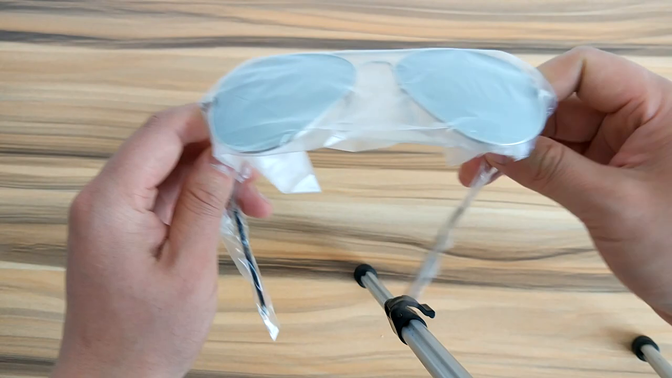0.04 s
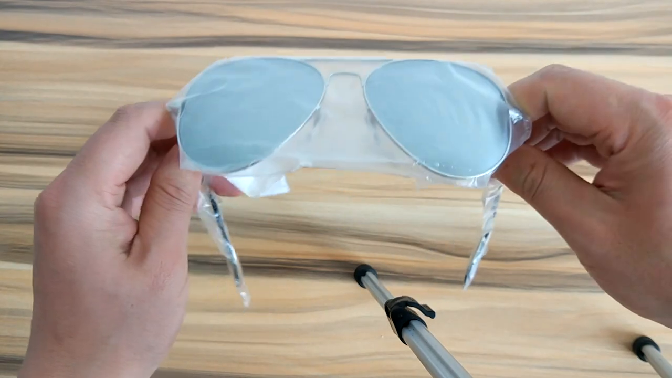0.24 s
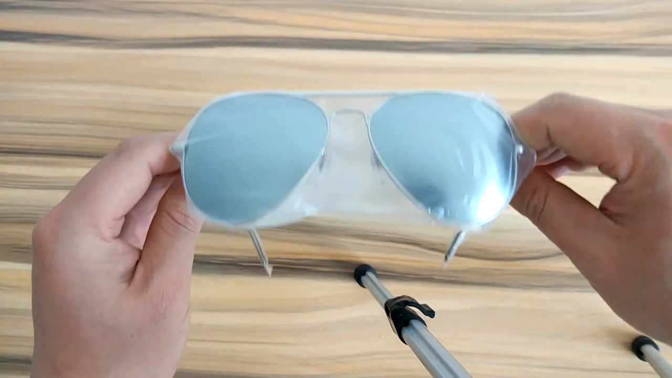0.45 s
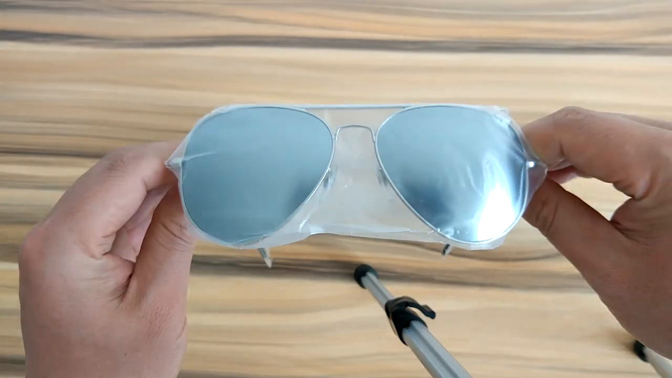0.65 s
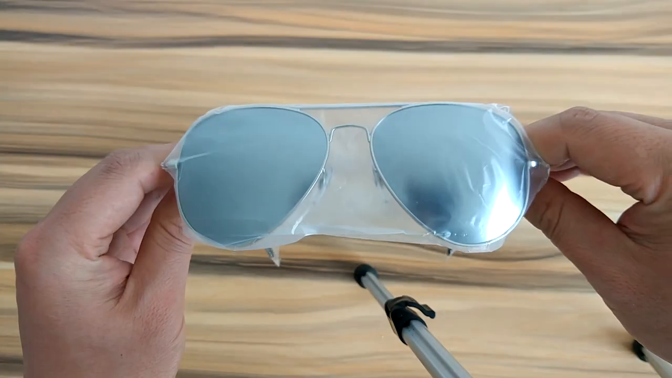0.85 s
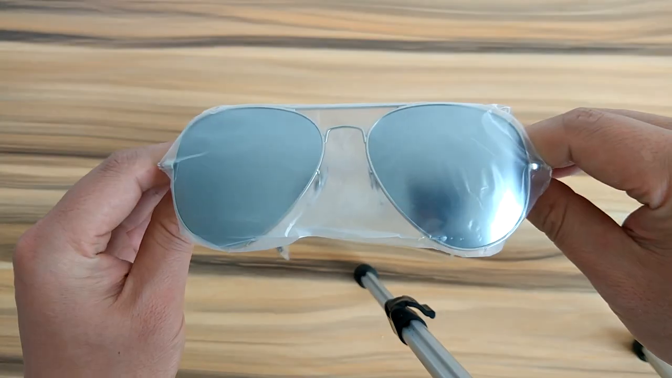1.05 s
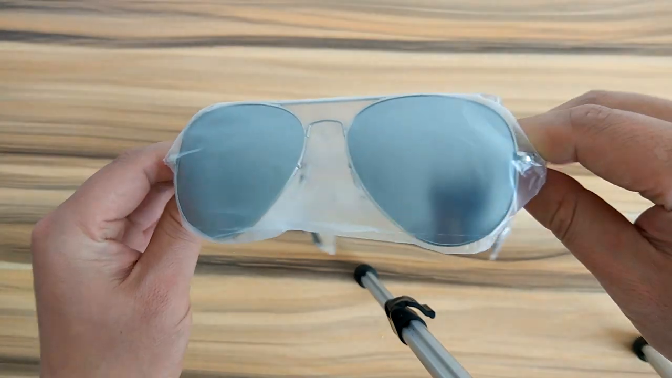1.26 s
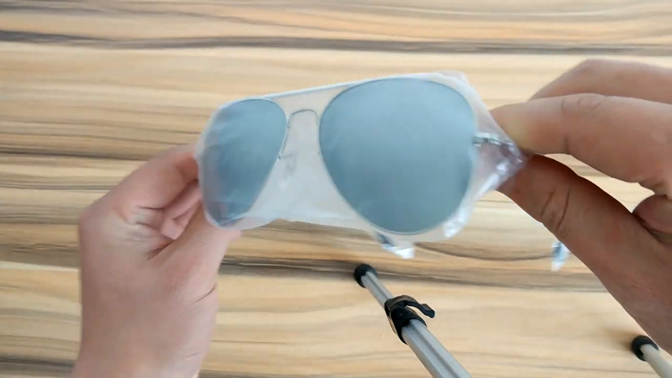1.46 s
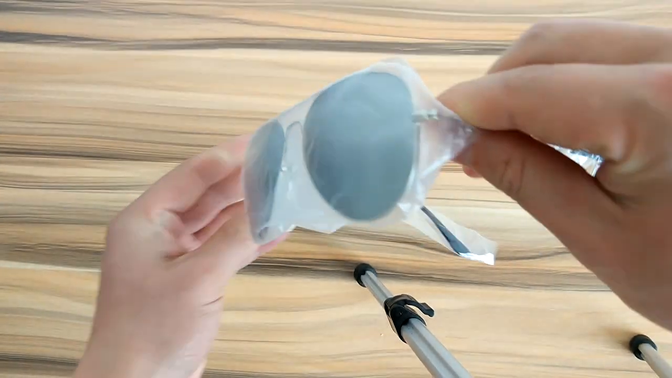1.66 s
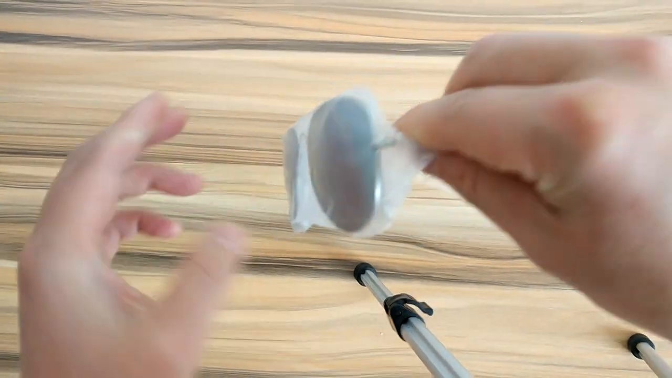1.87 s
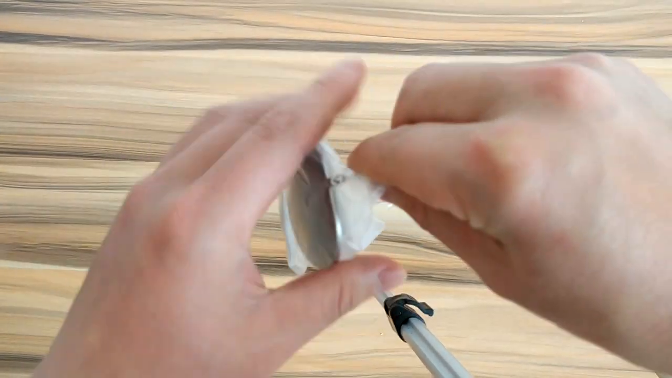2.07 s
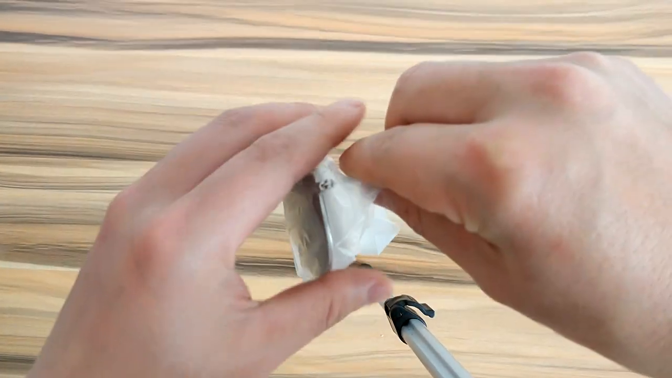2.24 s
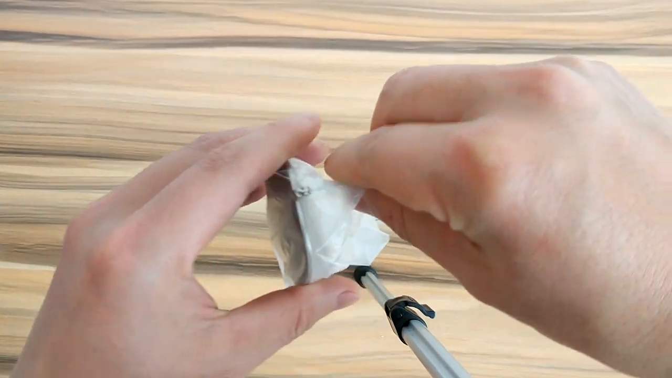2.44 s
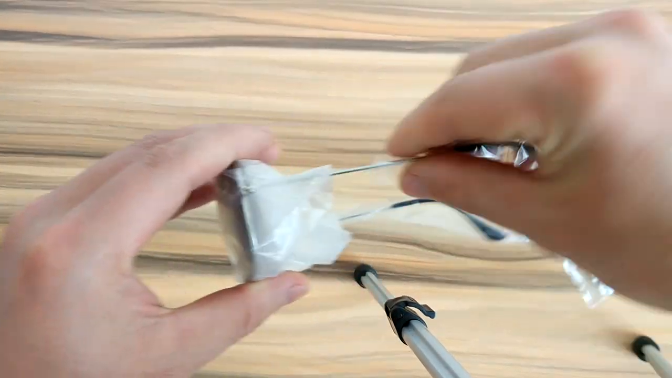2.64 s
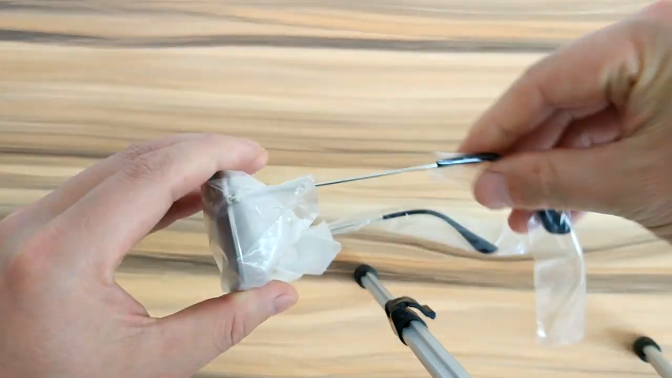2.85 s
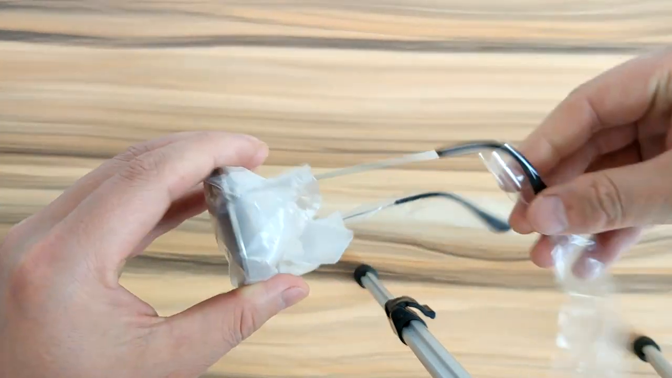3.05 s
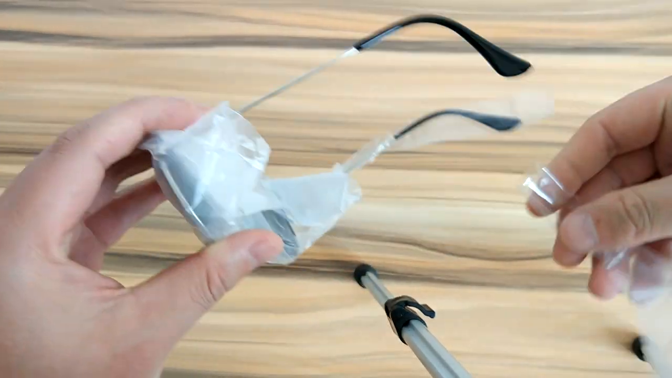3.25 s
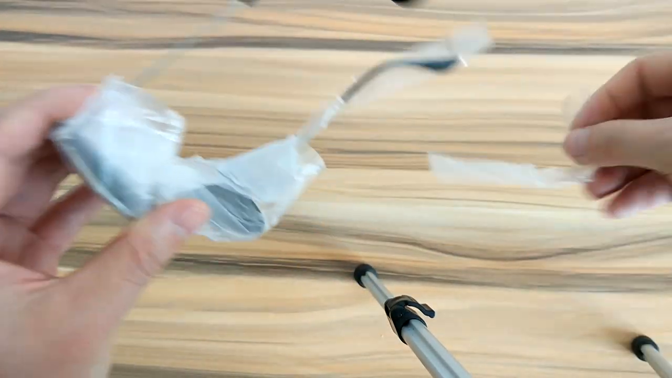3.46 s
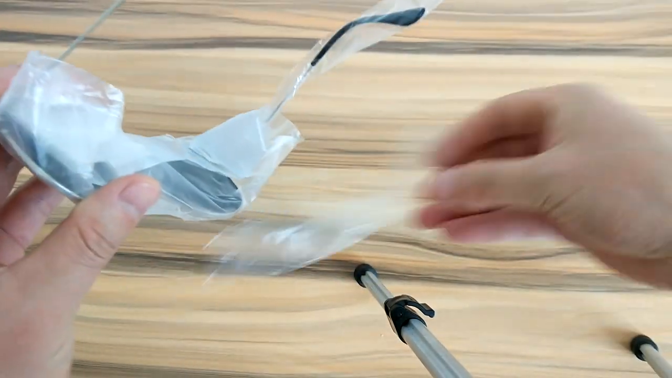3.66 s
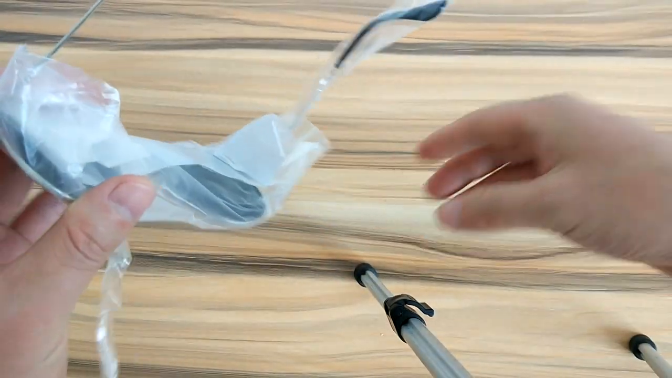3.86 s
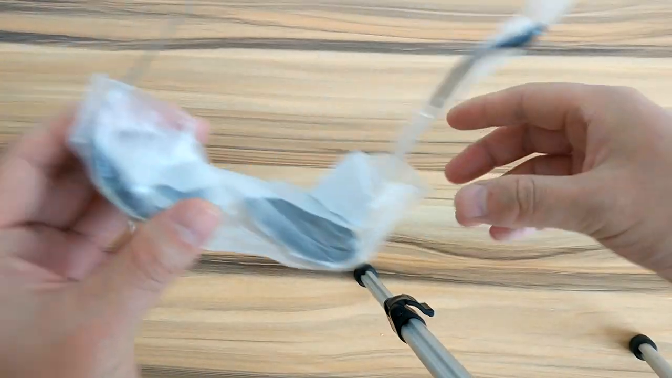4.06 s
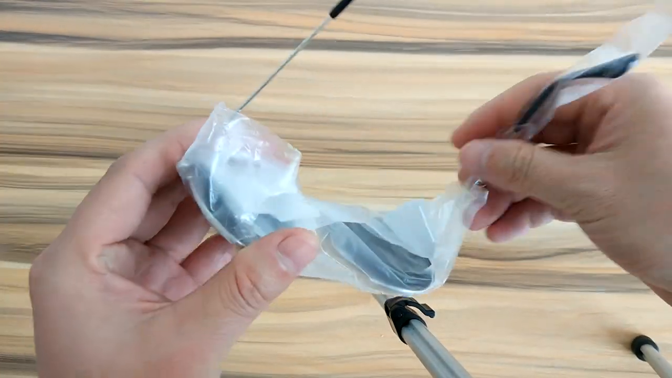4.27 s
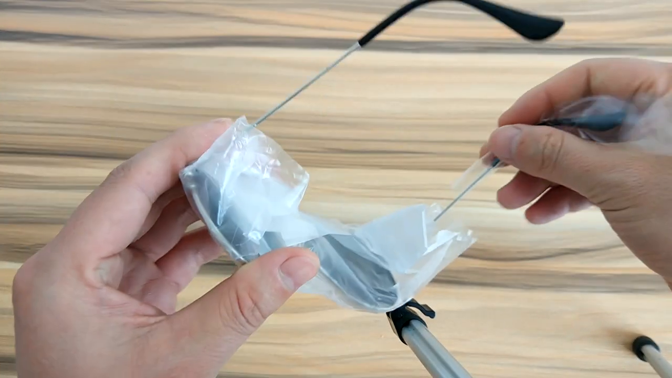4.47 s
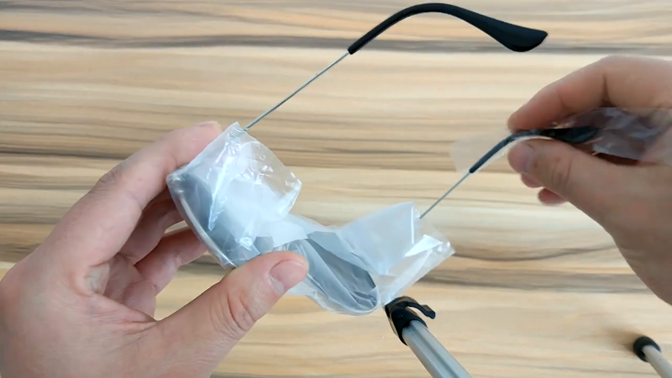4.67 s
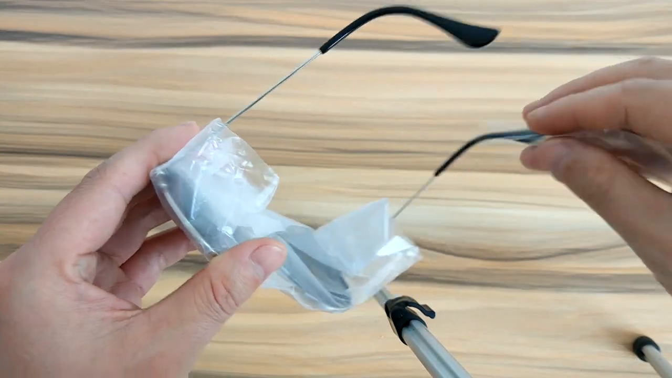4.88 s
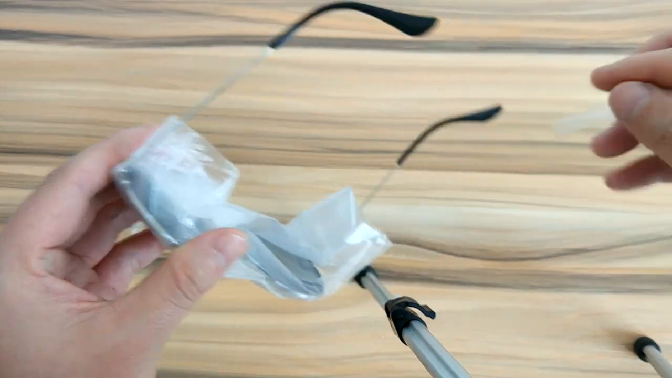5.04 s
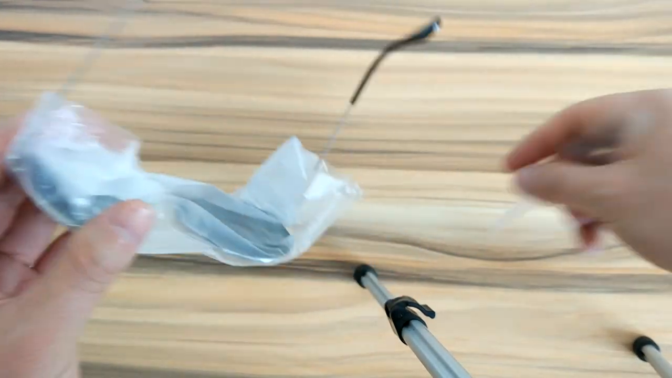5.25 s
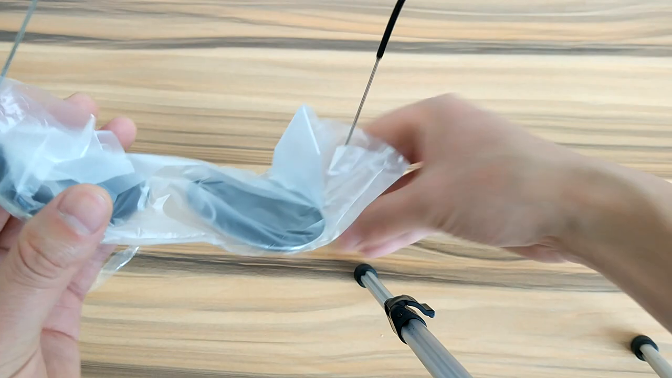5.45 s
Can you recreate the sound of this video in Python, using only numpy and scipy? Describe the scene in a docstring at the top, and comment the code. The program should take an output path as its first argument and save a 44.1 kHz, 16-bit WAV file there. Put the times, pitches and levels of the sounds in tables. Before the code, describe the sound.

Thin plastic film crackles sharply and unevenly close to the microphone as it is pulled off metal sunglasses in a bare room.

```python
"""Thin plastic wrap is pulled off a pair of sunglasses close to a two-microphone phone in a bare room.
It starts with busy crackling, thins out, then comes back in bouts; the big crumple near 2.6 s starts dull
and turns bright. After a lull near 4 s the film is worked again, then calms; a thin tone rises at the end.
Creases snap as short dying noise with a ring, folds pop lower, and tiny creases rustle as random ticks.
A smooth noise tail answers as the room; under it all lie a low murmur, deep rumble and faint hums."""
import sys
import numpy as np
from scipy import signal
from scipy.fft import rfft, irfft
from scipy.io import wavfile

SR = 44100
rng = np.random.default_rng(int(sys.argv[2]) if len(sys.argv) > 2 else 0)


def materialize(psi):
    """Save the field psi as 16-bit PCM at rate SR to the path in sys.argv[1].

    A 1-D psi becomes a single channel; in a 2-D psi each row is a channel.
    """
    bounded = np.clip(np.atleast_2d(psi).T, -1, 1)
    quanta = np.round(bounded * 32767).astype(np.int16)
    wavfile.write(sys.argv[1], SR, quanta)


def how_loud(loudness_db):
    """Turn decibels into a plain amplitude multiplier (0 dB gives 1, 20 dB gives 10)."""
    steps = np.asarray(loudness_db, float) / 20
    return 10 ** steps


N = 242991


def rms_one(x):
    """Scales to unit rms."""
    return x / np.sqrt(np.mean(x ** 2) + 1e-20)


def band(x, low_hz, high_hz):
    """Keeps one range of pitch: Butterworth band-pass along the last axis."""
    edges_hz = [low_hz, min(high_hz, 0.45 * SR)]
    return signal.sosfilt(signal.butter(2, edges_hz, "band", fs=SR, output="sos"), x)


def resonance(x, hz, width_hz):
    """Two-pole resonance with gain 1 on top."""
    r = np.exp(-np.pi * width_hz / SR)
    poles = [1, -2 * r * np.cos(2 * np.pi * hz / SR), r * r]
    return signal.lfilter(np.array([1, 0, -1]) * (1 - r * r) / 2, poles, x)


def pair(mid, side, likeness, right_db):
    """Left and right from a shared and an unshared signal; likeness 1 makes them the same but for level."""
    alike = np.clip(likeness, 0, 1)
    shared = np.sqrt(1 + alike) * mid
    own = np.sqrt(1 - alike) * side
    return np.array([shared + own, how_loud(right_db) * (shared - own)]) / np.sqrt(2)


def slow(rate_hz):
    """Slow random wander with rms 1: noise through two equal low-pass poles."""
    r = np.exp(-2 * np.pi * rate_hz / SR)
    wander = signal.lfilter([1], [1, -2 * r, r * r], rng.standard_normal(N + SR))
    return rms_one(wander[SR:])   # the filter has settled by then


def over_time(table):
    """Joins the points of a (time, level) table into a curve over the whole scene."""
    return np.interp(np.arange(N) / SR, *np.transpose(table))


# hands and table scatter every tick; the shaded right microphone hears more of this
SCATTER_MS = 7.4
SCATTER_DB = [[-20], [-9.5]]   # left, right: re the direct sound at the same microphone
SIDE_CLICKS_DB = -11   # typical level of the weaker clicks re the main one


def bursts(s, level_db, pitch_hz, sharpness, layer, order=1, side_db=SIDE_CLICKS_DB):
    """Each event is one click among five weaker ones: dying noise with a ring at a pitch of its own."""
    low_hz, high_hz, decay_ms, offset_db, likeness, right_db = layer
    length, lead = 1024, 256   # samples per burst, and before its main click
    weaker = np.arange(6) > 0
    draw = rng.random((len(s), 4, 6))
    before_or_after = np.where(draw[:, 2] < 0.45, -1, 1)
    lags_ms = -2.09 * np.log(1 - draw[:, 0]) * before_or_after * weaker   # 2.09 ms away on average
    sizes = how_loud(side_db * (draw[:, 1] + 0.5) * weaker)[..., None]
    since_ms = (np.arange(length) - lead) * 1000 / SR - lags_ms[..., None]
    rise_ms = 0.0032 + 0.25 * draw[:, 3, :, None]   # each click swells over this short time, drawn at random
    rise = sizes * np.exp(np.minimum(since_ms, 0) / rise_ms)
    direct, scattered = (np.sum(rise * np.exp(-np.maximum(since_ms, 0) / ms), axis=1)
                         for ms in (decay_ms, SCATTER_MS))
    shape = (direct + scattered * how_loud(SCATTER_DB)[..., None]) * how_loud([[[0]], [[right_db]]])
    noise = rng.standard_normal((len(s), 2, length))
    burst = band(pair(noise[:, 0], noise[:, 1], likeness, right_db=1.0) * shape, low_hz, high_hz)
    # one damped ring, passed through order times
    ratio = np.arange(length // 2 + 1) * SR / length / pitch_hz[:, None]
    ring = ratio / (1 - ratio ** 2 + 1j * ratio / sharpness)
    burst = irfft(rfft(burst) * ring ** order, length)
    peak = np.max(np.abs(port(burst[0])), axis=1)   # as the left port passes it
    burst = burst * (how_loud(level_db + offset_db) / peak)[:, None]
    out = np.zeros((2, N + 2 * length))
    for k, at in enumerate(np.maximum(np.round(s * SR).astype(int), 0)):
        out[:, at:at + length] += burst[:, k]
    return out[:, lead:lead + N]


# the loud or lone snaps of the film: start_s, peak_db (before the layer's offset), body_db (re peak_db)
SNAP_LIST = [(0.045, -15.5, -12), (0.057, -14, -20), (0.086, -16, -21), (0.1239, -11.5, -21.5),
             (0.131, -18, -34), (0.1357, -12, -21), (0.1446, -12.5, -15), (0.1618, -8.5, -20),
             (0.169, -10.5, -13.5), (0.193, -15, -18), (0.2244, -18, -19), (0.2332, -17.5, -14.5),
             (0.241, -16.5, -20), (0.2731, -10.5, -17.5), (0.2948, -13, -14.5), (0.4246, -15, -21.5),
             (0.4742, -23, -11), (0.481, -12.5, -31), (0.4935, -26, -17), (0.5093, -21, -33),
             (0.5494, -16, -21), (0.562, -16, -44), (0.6099, -16, -19.5), (0.718, -28.5, -16.5),
             (0.8147, -21.5, -27), (0.8548, -25.5, -15), (0.8703, -23, -37), (0.9027, -35, -31),
             (0.909, -16, -23), (0.9993, -32, -23), (1.0333, -27, -20.5), (1.101, -28, -14),
             (1.117, -30, -14), (1.167, -39.5, 5.5), (1.1807, -25, -17), (1.1856, -11.5, -16),
             (1.1973, -14.5, -16.5), (1.228, -21.5, -16.5), (1.2424, -27, -26), (1.2495, -3, -51),
             (1.262, -15.5, -14), (1.292, -20.5, -12), (1.4462, -18.5, -17), (1.494, -13.5, -11.5),
             (1.5297, -17, -36), (1.542, -12, -24), (1.548, -6.5, -33), (1.561, -21, -43),
             (1.58, -12, -22.5), (1.593, -7.5, -24.5), (1.608, -18.5, -16), (1.6802, -22.5, -16.5),
             (1.711, -17.5, -36), (1.7264, -18, -52), (1.7344, -18.5, -24), (1.769, -21.5, -17),
             (1.8587, -20, -12.5), (1.9146, -15, -36), (1.942, -26.5, -15.5), (2.1276, -27, -20.5),
             (2.15, -11.5, -26.5), (2.163, -33, -3.5), (2.184, -12.5, -18.5), (2.19, -7, -23),
             (2.205, -26, -18), (2.237, -14, -14.5), (2.269, -7, -19.5), (2.286, -17, -16),
             (2.2917, -18, -10), (2.3092, -21.5, -10.5), (2.401, -25, -10), (2.4107, -24, -21),
             (2.43, -19, -17), (2.4464, -29, -5), (2.476, -26.5, -28), (2.501, -13.5, -26),
             (2.5496, -15, -51), (2.561, -18, -21), (2.574, -14, -18.5), (2.584, -17.5, -12.5),
             (2.608, -20, -25), (2.621, -18, -30), (2.63, -20, -14), (2.642, -17, -13), (2.6648, -14, -13),
             (2.6771, -28, -17), (2.717, -15, -42), (2.741, -18, -28), (2.762, -18, -16), (2.77, -9, -30),
             (2.793, -11.5, -26), (2.802, -20, -40), (2.843, -28, -33), (2.862, -22, -30), (2.87, -12, -36),
             (2.899, -11, -33), (2.965, -23.5, -12), (3.021, -11.5, -23), (3.039, -15, -27),
             (3.066, -14, -39), (3.08, -16, -26), (3.093, -17, -21), (3.1, -9, -39), (3.134, -10, -30),
             (3.1413, -19, -10), (3.146, -11, -31), (3.1614, -14, -43), (3.194, -15, -19),
             (3.205, -9.5, -29.5), (3.244, -27.5, -7), (3.2529, -14, -20), (3.266, -12, -19),
             (3.296, -14.5, -23), (3.316, -15.5, -41), (3.3534, -12, -47), (3.3946, -13.5, -23),
             (3.403, -14.5, -45), (3.4554, -16, -32), (3.466, -15, -26), (3.475, -12, -21),
             (3.4836, -12.5, -22.5), (3.4943, -13, -24.5), (3.516, -19, -35), (3.5482, -15, -42),
             (3.555, -21, -26), (3.565, -15, -32), (3.578, -11.5, -29), (3.601, -13, -37),
             (3.688, -21, -44), (3.725, -22, -16.5), (3.7317, -10, -31), (3.738, -18.5, -17),
             (3.7642, -7, -31.5), (3.812, -22, -18.5), (4.0553, -36.5, -20), (4.1049, -18, -16.5),
             (4.1115, -17, -26), (4.277, -15, -28), (4.288, -15, -19), (4.3588, -21.5, -12.5),
             (4.39, -17, -16.5), (4.401, -26, -10.5), (4.437, -17.5, -20), (4.448, -12.5, -18),
             (4.4741, -16, -12.5), (4.486, -25, -26), (4.516, -15, -31), (4.522, -12.5, -28),
             (4.5308, -13.5, -25), (4.5607, -8, -23), (4.566, -21, -13), (4.638, -16, -26),
             (4.662, -17.5, -16.5), (4.678, -14.5, -17.5), (4.692, -8.5, -38), (4.706, -16.5, -16.5),
             (4.7114, -18.5, -16.5), (4.7394, -17, -36), (4.785, -9, -35), (4.802, -21, -33),
             (4.8468, -10, -31), (4.855, -12.5, -36), (4.872, -20.5, -16.5), (4.8797, -15, -24),
             (4.888, -11.5, -28), (4.893, -13.5, -27), (4.9005, -14, -28), (4.915, -16, -42),
             (4.9184, -8.5, -23.5), (4.9292, -12.5, -27), (4.94, -17, -20), (4.9493, -17, -28),
             (4.962, -22, -38), (4.967, -11, -23), (4.972, -8.5, -26), (4.9895, -17, -32),
             (5.0517, -21, -30), (5.0642, -6, -50), (5.087, -19.5, -29), (5.1494, -18, -27),
             (5.1811, -17.5, -22), (5.1914, -22.5, -17), (5.266, -21, -32), (5.2958, -27, -13),
             (5.3794, -15.5, -50)]
# bright and lower layer of a snap: low_hz, high_hz, decay_ms, offset_db (snaps and pops only),
# likeness (left to right, 0-1), right_db (re left, before a further 1 dB for the right)
CRACK_LAYER = (4499, 15994, 0.7, 0.5, 0.1, -11.5)
BODY_LAYER = (778, 5507, 3, 2.5, 0.2, -3.5)


def snaps():
    """A bright crack with a longer, lower body; crack and body each get a ring pitch drawn at random."""
    s, peak_db, body_db = np.transpose(SNAP_LIST)
    # a crack with little body comes alone
    side_db = np.minimum(SIDE_CLICKS_DB + 0.9 * (body_db[:, None] + 22), -3)
    draw = rng.random((len(s), 2))
    crack_hz = 7000 * 2 ** draw[:, 0]
    body_hz = 2200 * 2.95 ** draw[:, 1]
    crack = bursts(s, peak_db, crack_hz, 0.76, CRACK_LAYER, side_db=side_db)
    body = bursts(s, peak_db + body_db, body_hz, 0.76, BODY_LAYER, side_db=side_db)
    return crack + body


# low pops of large folds: start_s, peak_db (before the layer's offset), pitch_hz
POP_LIST = [(0.041, -45, 1190), (0.07, -42.5, 1200), (0.167, -37, 900), (0.217, -45, 1290),
            (0.295, -35, 964), (0.55, -51, 394), (1.423, -55, 865), (1.493, -49, 900), (1.547, -49, 900),
            (1.582, -47, 900), (2.176, -47, 1000), (2.237, -51.5, 340), (2.269, -47, 1220),
            (2.312, -45.5, 380), (2.427, -43, 1040), (2.558, -41.5, 870), (2.574, -45, 810),
            (2.603, -56, 1100), (2.632, -44, 845), (2.659, -43, 353), (2.662, -36, 1100),
            (3.092, -47.5, 1120), (3.201, -47.5, 393), (3.264, -46.5, 1060), (3.471, -47.5, 1230),
            (3.766, -47.5, 820), (4.104, -46.5, 1250), (4.232, -53, 370), (4.238, -47.5, 390),
            (4.287, -42, 1250), (4.398, -46.5, 590), (4.473, -41.5, 1560), (4.564, -47, 333),
            (4.927, -42, 1040)]
# lowest layer, same columns as the crack: low_hz, high_hz, decay_ms, offset_db, likeness (0-1), right_db
THUD_LAYER = (145, 1989, 1.5, 3.5, 0.55, -4)


def pops():
    """Large folds flip over with a short low pop, blunter the lower it is, and the frame thumps under it."""
    s, peak_db, pitch_hz = np.transpose(POP_LIST)
    sharpness = np.clip(pitch_hz[:, None] / 450, 1, 2.2)
    pop = bursts(s, peak_db, pitch_hz, sharpness, THUD_LAYER, order=2)
    thump_hz = 340 * 0.82 ** rng.random(len(s))
    thump = bursts(s, peak_db - 13.5, thump_hz, 2.1, THUD_LAYER, order=2)
    return pop + thump


# what the wrapped frame rings with under the rustle: pitch_hz, width_hz (of one pass), level_db
FRAME_RINGS = [(349, 283, -7.5), (900, 260, -7.5)]


def frame(x):
    """The wrapped frame colours the low part of the rustle: double resonances of alternating sign."""
    out = 0
    for k, (hz, width_hz, db) in enumerate(FRAME_RINGS):
        ring = resonance(resonance(x, hz, width_hz), hz, width_hz)
        out = out + (-1) ** k * how_loud(db) * ring
    return out


# how hard the film is worked, as rustle level before each layer's share: start_s, level_db
HANDLING_CURVE = [(0, -31), (.4, -45), (.7, -54.5), (1.149, -57), (1.22, -47.5), (1.36, -50), (1.55, -39),
                  (1.75, -55.5), (2.13, -54), (2.24, -33), (2.54, -60), (2.621, -29.5), (2.72, -31),
                  (2.8, -27.5), (2.98, -46.5), (3.55, -46.5), (3.78, -61), (3.817, -33.5), (3.86, -63),
                  (4.08, -58.5), (4.16, -46), (4.25, -51), (4.5, -41.5), (4.8, -48), (4.95, -27.5),
                  (5.1, -46), (5.3, -45), (5.51, -55.5)]
# how strong the low layers of the rustle are, before brightening and share: start_s, level_db
DULLNESS_CURVE = [(0, -1.5), (1.0, 4), (2.2, 3.5), (2.5, 8.5), (2.64, 7.5), (2.8, -2), (3.0, 1.5), (4.1, 2),
                  (4.4, 5), (5.51, -0.5)]


def rustle():
    """Tiny creases tick in clumps, with sizes from faint to sharp, into crack, body and thud layers."""
    level_db = over_time(HANDLING_CURVE)
    # harder work brightens: the low layers lose 0.26 dB per dB of rustle
    dull_db = over_time(DULLNESS_CURVE) - 0.26 * (level_db + 47.5)
    chance_per_s = 400 * how_loud(3 * slow(44.5))   # swings by 3 dB rms about a base rate
    born = rng.random(N) < chance_per_s / SR
    ticks = born * how_loud(5 * np.minimum(rng.exponential(1, N), 3.0))
    out = 0
    for layer, share_db in ((CRACK_LAYER, -14.0), (BODY_LAYER, dull_db - 17), (THUD_LAYER, dull_db - 25.5)):
        low_hz, high_hz, decay_ms, _, likeness, right_db = layer
        fades = np.exp(-1000 / (np.array([decay_ms, SCATTER_MS]) * SR))
        direct, scattered = (signal.lfilter([1], [1, -fade], ticks + 1e-18) for fade in fades)
        shape = (direct + scattered * how_loud(SCATTER_DB)) * how_loud([[0], [right_db]])
        noise = pair(*rng.standard_normal((2, N)), likeness, right_db=1.0)
        grains = band(noise * shape, low_hz, high_hz)
        if layer is THUD_LAYER:
            grains = frame(grains)
        out = out + how_loud(level_db + share_db) * grains / np.std(grains[0])
    return out


# bands of the room tail: top_hz, t60_s (time to fall by 60 dB), level_db
ROOM_BANDS = [(640, 0.76, -11.5), (2320, 0.49, -7.5), (5560, 0.27, -5), (16500, 0.46, -9.5)]
# likeness of room tail and room tone at the two microphones: pitch_hz, likeness (0-1)
LIKENESS_CURVE = [(60, 0.7), (300, 0.85), (900, 0.72), (2500, 0.15)]


def room(x):
    """A diffuse tail from the first wall on, more alike at the microphones in the bass, dying band by band."""
    t = np.arange(SR) / SR - 0.009   # the first wall answers after 9 ms
    build_up = np.clip(t * 1000 / 14.8, 0, 1)   # the tail thickens over 14.8 ms
    tail, low_hz = 0, 100
    for high_hz, t60, db in ROOM_BANDS:
        likeness = np.interp(np.sqrt(low_hz * high_hz), *np.transpose(LIKENESS_CURVE))
        noise = pair(*rng.standard_normal((2, SR)), likeness, right_db=3)
        dying = noise * build_up * how_loud(-60 * t / t60)
        to_unit_energy = np.sqrt(6 * np.log(10) / (t60 * SR))
        tail = tail + how_loud(db) * band(dying, low_hz, high_hz) * to_unit_energy
        low_hz = high_hz
    # the film was crackling just before, so the room already rings: the opening, backwards, stands in
    lead = SR // 5
    earlier = how_loud(9.0) * x[:1, lead:0:-1]
    return signal.fftconvolve(np.hstack([earlier, x[:1]]), tail, axes=1)[:, lead:lead + N]


# colour of the room tone, only its shape counts: pitch_hz, level_db (per Hz)
ROOM_TONE_CURVE = [(30, -22), (120, -14.5), (180, 3.5), (280, 3), (390, -1.5), (520, -3.5), (750, -0.5),
                   (1100, -15), (2000, -9), (6000, -10.5), (15000, -43)]


def room_tone():
    """Low murmur of the building over faint hiss: shaped noise whose level wanders a little."""
    log_hz = np.log(np.maximum(np.arange(N // 2 + 1) * SR / N, 10))
    tone, alike = np.transpose(ROOM_TONE_CURVE), np.transpose(LIKENESS_CURVE)
    colour = how_loud(np.interp(log_hz, np.log(tone[0]), tone[1]))
    mid, side = rfft(rng.standard_normal((2, N))) * colour
    both = pair(mid, side, np.interp(log_hz, np.log(alike[0]), alike[1]), right_db=2.0)
    return how_loud(-67 + 1.86 * slow(14.0)) * rms_one(irfft(both, N))


def rumble():
    """Lumpy deep noise, stronger while the hands work."""
    work_db = over_time(HANDLING_CURVE) + 45
    deep = rms_one(band(pair(*rng.standard_normal((2, N)), 0.37, right_db=-1.0), 18, 75))
    # it follows 0.21 of the rustle's swing and is uneven by 7.5 dB rms
    return how_loud(-78 + 0.21 * work_db + 7.5 * slow(12.0)) * deep


# faint hums: pitch_hz, width_hz, level_db (about which each one swells)
HUM_LIST = [(198, 9.7, -84), (367, 18, -78), (433.4, 7, -78)]
# thin tone at the end: start_s, pitch_hz (at its start), level_db (peak)
END_TONE = (5.42, 945, -66)


def hums():
    """Narrow bands of noise swell and fade as faint hums; one thin tone rises at the end."""
    out = 0
    for hz, width_hz, db in HUM_LIST:
        hum = rms_one(resonance(rng.standard_normal(N), hz, width_hz))
        out = out + how_loud(db + 4.2 * slow(9.4)) * hum
    start_s, hz, db = END_TONE
    since_s = np.arange(N) / SR - start_s
    fade_in = np.clip(since_s / 0.057, 0, 1)
    cycles = hz * np.cumsum(1 + 0.15 * since_s) / SR
    return out + how_loud(db) * fade_in * np.sin(2 * np.pi * cycles)


def port(x):
    """The port of the left microphone, which faces the film, rings near 12 kHz."""
    return x + how_loud(20.5) * resonance(x, 11855, 1920)


def scene():
    """Film close by, its tail in the room, the room tone, hums and rumble."""
    film = snaps() + pops() + rustle()
    return film + room(film) + room_tone() + hums() + rumble()


def top_cut(x):
    """Nothing passes above the cut-off."""
    return signal.sosfilt(signal.butter(12, 16450, fs=SR, output="sos"), x)


def record(dry):
    """The left port rings in the top octave; bass below 147 Hz and treble above 14350 Hz are cut."""
    x = [port(dry[0]), dry[1]]
    x = signal.sosfilt(signal.butter(2, 147, "high", fs=SR, output="sos"), x)
    x = signal.sosfilt(signal.cheby1(14, 1, 14350, fs=SR, output="sos"), x)
    return top_cut(x)


dry = scene()
out = record(dry)
materialize(out)
```